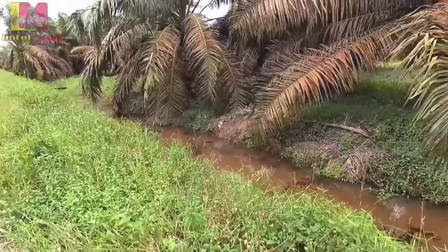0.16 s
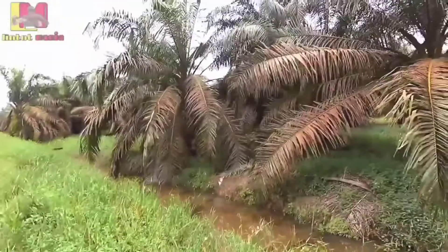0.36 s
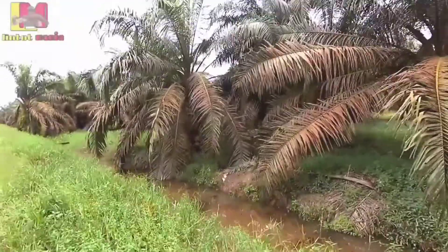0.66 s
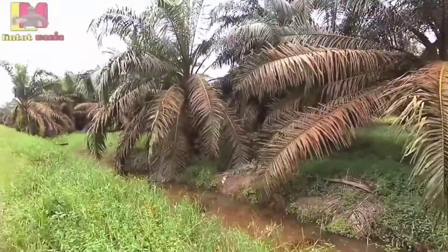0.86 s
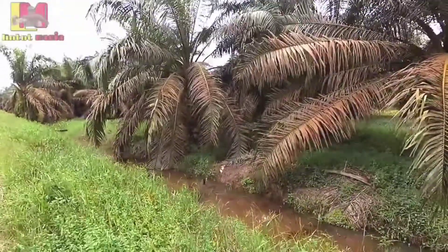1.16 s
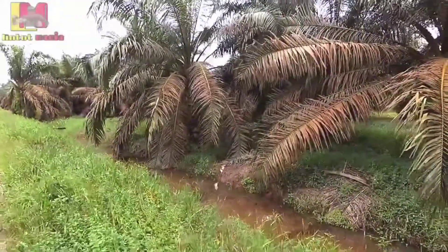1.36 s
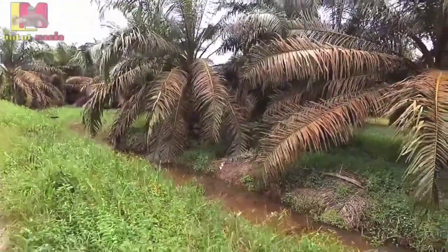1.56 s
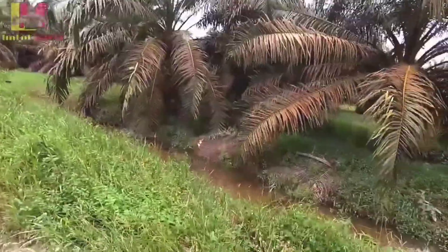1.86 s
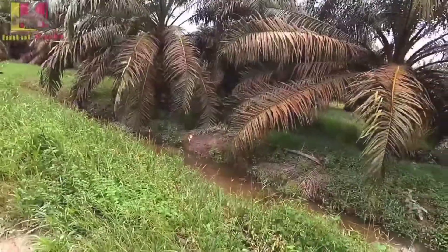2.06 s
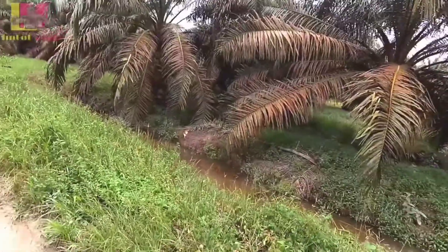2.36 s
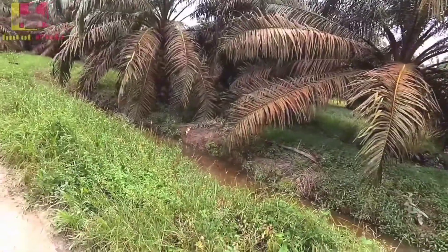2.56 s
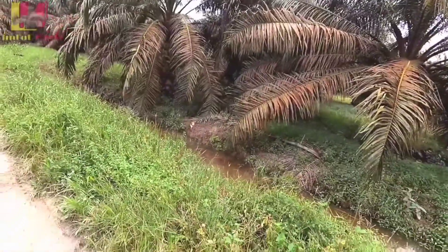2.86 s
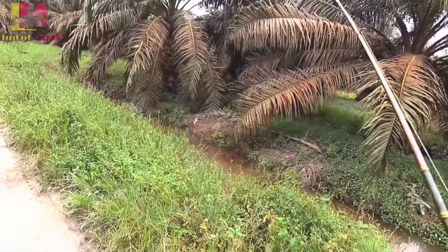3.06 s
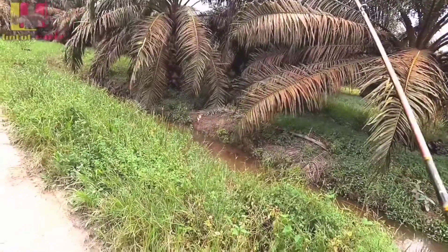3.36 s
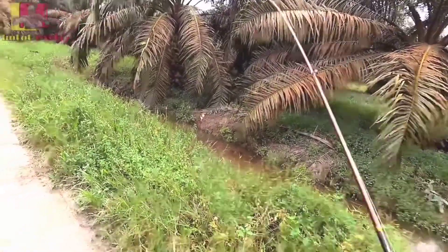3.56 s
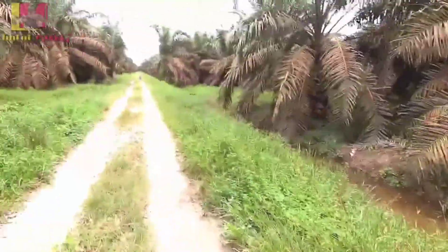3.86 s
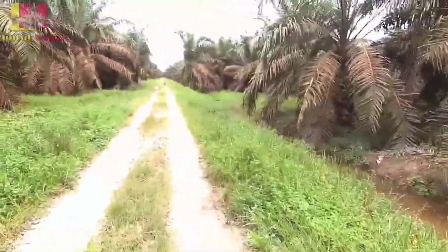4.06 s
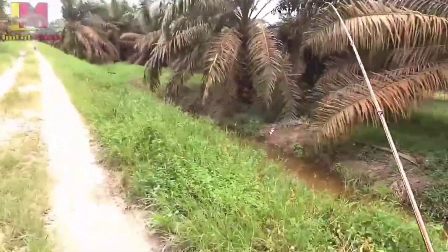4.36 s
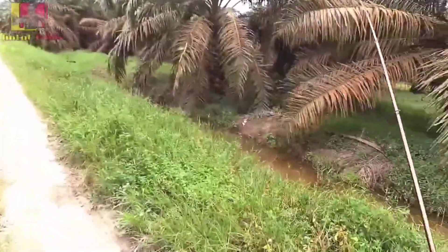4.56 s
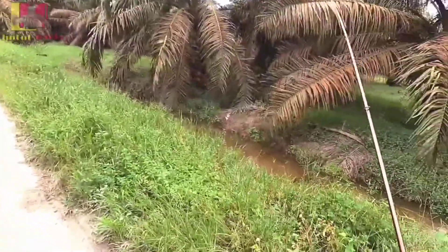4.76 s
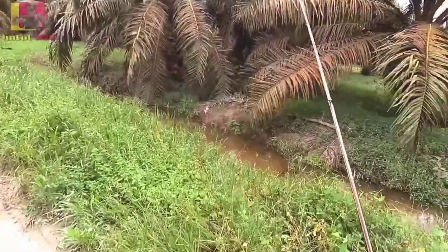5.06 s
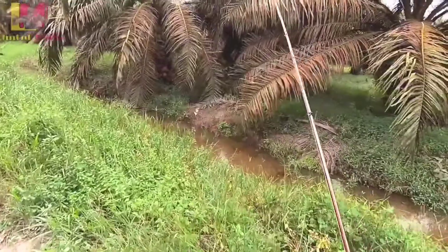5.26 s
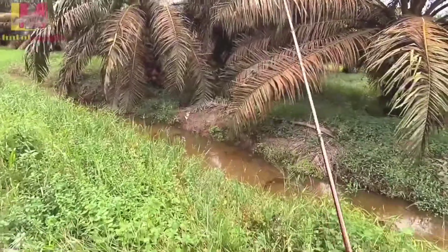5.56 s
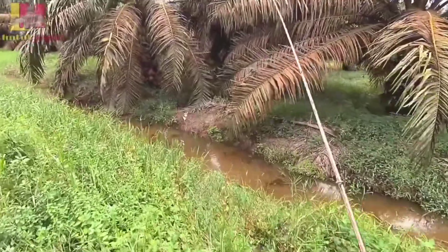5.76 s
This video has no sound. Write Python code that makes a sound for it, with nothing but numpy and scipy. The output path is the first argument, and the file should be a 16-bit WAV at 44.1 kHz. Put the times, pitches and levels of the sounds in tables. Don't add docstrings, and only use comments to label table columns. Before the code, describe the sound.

Someone treads slowly through dry grass on a dirt track, stems crackling, while distant cicadas and a shrill cricket hiss on.

```python
import sys
import numpy as np
from scipy import signal
from scipy.io import wavfile

SR = 44100
rng = np.random.default_rng(int(sys.argv[2]) if len(sys.argv) > 2 else 0)


def voltage_ratio(level):
    return 10 ** (np.asarray(level, float) / 20)


def file_out(sig):
    cols = np.atleast_2d(sig).T
    lim = np.clip(cols, -1, 1)
    pcm = np.round(lim * 32767).astype(np.int16)
    wavfile.write(sys.argv[1], SR, pcm)


N = 261072


def rms_one(x):
    return x / np.sqrt(np.mean(x ** 2) + 1e-20)


def in_time(rows):
    s, *columns = np.transpose(rows)
    return [np.interp(np.arange(N) / SR, s, c) for c in columns]


def at_hz(points, hz):
    table_hz, values = np.transpose(points)
    return np.interp(np.log(hz), np.log(np.maximum(table_hz, 1)), values)


def drift(rate):
    r = np.exp(-80 * np.pi * rate / SR)
    slow = signal.lfilter([1], [1, -2 * r, r * r], rng.standard_normal(N // 40 + 2002))[2000:]
    return np.interp(np.arange(N) / 40, np.arange(len(slow)), rms_one(slow))


def swell(peak_s, peak_db, rise_db_per_s, fall_db_per_s):
    t = np.arange(N) / SR - peak_s
    drop_db = np.where(t < 0, -rise_db_per_s, fall_db_per_s) * t
    return voltage_ratio(peak_db - np.minimum(drop_db, 90))


def ring(clicks, hz, t60):
    r, w = voltage_ratio(-60 / (t60 * SR)), 2 * np.pi * hz / SR
    return signal.lfilter([0, np.sin(w)], [1, -2 * r * np.cos(w), r * r], clicks + 1e-18)


def band(x, low_hz, high_hz):
    edges = [low_hz, min(high_hz, .45 * SR)]
    return signal.sosfilt(signal.butter(2, edges, "band", fs=SR, output="sos"), x)


def pan(left_right_db):
    return voltage_ratio(np.array([left_right_db / 2, -left_right_db / 2]))


def stereo(mid, side, alike):
    alike = np.clip(alike, -1, 1)
    return np.sqrt(1 + alike) * mid + np.sqrt(1 - alike) * side * [[1], [-1]]


# f/Hz, likeness (-1 to 1)
FAR_LIKENESS = [(60, 0.41), (250, 0.18), (950, -0.69), (3770, -0.6), (15000, 0.17)]


def coloured(spectrum, edges, patchy_db):
    out, white = 0, rng.standard_normal((2, 2, N))
    for k, (low, high) in enumerate(zip(edges, edges[1:])):
        hz = np.sqrt(low * high)
        mid, side = band(white[k % 2], low, high)
        gain = voltage_ratio(at_hz(spectrum, hz) + patchy_db * drift(23.0))
        out = out + gain * stereo(mid, side, at_hz(FAR_LIKENESS, hz))
    return rms_one(out)


# f/Hz, level/dB per Hz
AIR = [(18, -49), (30, -7), (69, -5), (482, 1), (1260, -2.5), (1980, -2), (3040, -23), (3910, -6),
       (4670, 9), (5860, -0.5), (7170, -18), (8780, -41), (12500, -6), (16200, -36), (22000, -120)]


def open_air():
    return voltage_ratio(-62.5) * coloured(AIR, 30 * 2 ** np.arange(0, 9, .6), patchy_db=1.5) * pan(-3.0)[:, None]


# t/s, level/dB
MOTOR = [(0.0, -102), (4.2, -93), (4.6, -84), (5.4, -81), (5.92, -93)]


def motor():
    pitch_hz, width_hz = 136, 5.4
    note = band(rng.standard_normal(N), pitch_hz - width_hz / 2, pitch_hz + width_hz / 2)
    return voltage_ratio(in_time(MOTOR)[0]) * rms_one(note) * pan(-5.0)[:, None]


# t/s, level/dB, left-right/dB
CICADAS = [(0.0, -49.5, -3.5), (0.7, -51, -7.5), (1.6, -50.5, -6), (2.11, -48, -5), (2.49, -49, -7),
           (2.87, -48.5, -3), (3.1, -48.5, -8), (4.12, -48.5, -6), (5.92, -49.5, -6)]
# f/Hz, width/Hz, level/dB
CICADA_BANDS = [
    (7210, 1100, -3.5),
    (3016, 280, -17.5),
    (4460, 560, -16),
]


def cicadas():
    level_db, side_db = in_time(CICADAS)
    chorus = 0
    for hz, width, db in CICADA_BANDS:
        hiss = band(rng.standard_normal((2, N)), hz - width / 2, hz + width / 2)
        hiss = band(hiss, hz - 0.72 * width, hz + 0.71 * width)
        chorus = chorus + voltage_ratio(db + 1.2 * drift(48)) * rms_one(hiss)
    return voltage_ratio(level_db - 3.0) * chorus * pan(side_db)


# t/s, level/dB, left-right/dB, throb/dB
CRICKET = [(0.03, -42, -6, -2), (0.15, -40, -7, -1), (0.26, -46.5, -9, -1), (0.37, -38.5, -8, 2),
           (0.55, -42, -10, -4), (0.8, -45, -8, 4), (1.4, -44, -10, 3), (1.85, -40, -9, 1.5),
           (2.42, -41, -9, 2), (2.8, -40.5, -9.5, 2), (3.6, -40, -9, 1), (4.3, -41.5, -8, 1),
           (5.0, -41, -7, 2), (5.8, -42, -8.5, 2.6), (5.92, -46, -8, -3)]
# f/Hz, level/dB per Hz
CRICKET_COLOUR = [(10000, -16), (12000, -13), (13500, -8), (14500, -4), (15300, 0), (16500, 0)]


def cricket():
    phrases_per_s, phrase_peak_s, strokes_per_s = 5.25, 3.885, 48
    level_db, side_db, throb_db = in_time(CRICKET)
    throb_db = throb_db * np.cos(2 * np.pi * phrases_per_s * (np.arange(N) / SR - phrase_peak_s))
    turns = np.cumsum(strokes_per_s * (1 + 0.044 * drift(2.8))) / SR
    strokes = 1.35 + (.5 + .5 * np.sin(2 * np.pi * turns)) ** 2 * voltage_ratio(2.0 * drift(12))
    rasp = band(coloured(CRICKET_COLOUR, np.geomspace(10000, 16500, 11), patchy_db=.5), 10000, SR)
    loudness = 0.5 + swell(4.241, 4, 2500, 1700)
    trill = loudness * voltage_ratio(level_db + throb_db) * rms_one(strokes * rasp)
    return trill * pan(side_db + 0.53 * throb_db)


# f/Hz, width/Hz, level/dB
BOOT_MODES = [(950, 130, -27), (1810, 29, -1.5), (2200, 60, -7), (2704, 39, 1), (3030, 140, 6),
              (3500, 26, -5)]
# t/s, level/dB
CREAK = [
    [(0.38, -57), (0.408, -50), (0.414, -52), (0.452, -60), (0.482, -54), (0.504, -39), (0.64, -72)],
    [(0.62, -79), (0.7, -63), (0.742, -53), (0.77, -61), (0.9, -57)],
]


def creak():
    out, voice = np.zeros(N), 0
    slips = (rng.random(N) < 500 / SR) * rng.standard_normal((len(BOOT_MODES), N))
    for slip, (hz, width, db) in zip(slips, BOOT_MODES):
        voice = voice + voltage_ratio(db) * rms_one(ring(slip, hz, 2.7 / (1.5 * width)))
    for rows in CREAK:
        s, level_db = np.transpose(rows)
        out += voltage_ratio(np.interp(np.arange(N) / SR, s, level_db - 1.5, left=-140, right=-140))
    return out * rms_one(voice) * pan(-12.0)[:, None]


# t/s of the middle, length/s, f/Hz, peak level/dB
SQUEAKS = [(0.395, .002, 3000, -43), (.402, 0.0014, 2750, -30.5), (0.4072, 0.0013, 2840, -25),
           (0.42, 0.0027, 1440, -34), (0.482, .006, 3000, -34), (0.485, 0.014, 1870, -35),
           (.499, 0.0033, 2200, -36.5), (0.512, 0.0043, 2950, -32), (0.517, 0.0044, 2700, -32),
           (0.524, 0.0041, 2930, -43), (0.541, 0.0092, 590, -40.5), (.553, 0.0048, 2950, -45),
           (0.554, .006, 1670, -44), (0.741, 0.0091, 3050, -48), (0.759, 0.086, 1740, -55.5),
           (0.939, 0.011, 1065, -52), (1.2, 0.045, 1010, -55.5), (1.259, 0.0017, 1160, -46),
           (1.616, 0.0015, 845, -34), (2.593, 0.034, 2960, -51), (2.598, 0.018, 820, -53),
           (2.635, 0.032, 2730, -51.5), (2.667, 0.017, 1070, -53), (2.695, 0.015, 1010, -50.5),
           (2.745, 0.0038, 1010, -51), (2.765, 0.0041, 950, -49), (2.945, 0.11, 1014, -56.5),
           (5.246, 0.01, 930, -58), (5.312, 0.015, 2635, -48.5), (5.323, 0.0068, 533, -49),
           (5.357, 0.0017, 1370, -39), (5.648, 0.007, 644, -47), (5.46, .05, 3030, -63),
           (5.53, 0.044, 3000, -63), (5.602, 0.044, 2980, -63), (5.659, 0.04, 3050, -62),
           (5.089, .05, 1130, -58), (5.146, 0.047, 1310, -61), (5.199, 0.074, 560, -60.5),
           (5.296, .05, 1100, -60), (5.39, 0.033, 1000, -61), (5.736, 0.0024, 1160, -53),
           (5.754, 0.002, 900, -60), (5.538, 0.0018, 1100, -55), (5.615, 0.0021, 860, -42),
           (4.63, .006, 540, -53), (0.778, 0.0038, 615, -51), (1.133, 0.0021, 1010, -45)]


def squeaks(size=6000):
    width_hz, clear_s = 420, .008
    out, t = np.zeros((2, N + size)), (np.arange(size) - size // 2) / SR
    for (s, length, hz, peak_db), grit in zip(SQUEAKS, rng.standard_normal((len(SQUEAKS), size))):
        rough = rms_one(band(grit, hz - width_hz / 2, hz + width_hz / 2))
        clear = np.exp(-length / clear_s)
        note = clear * np.sin(2 * np.pi * hz * t) + 0.68 * (1 - clear) * rough
        note = note * np.exp(-2 * (t / length) ** 2)
        at = round(s * SR) - size // 2
        out[:, at:at + size] += voltage_ratio(peak_db) * note * pan(-7.5)[:, None]
    return out[:, :N]


# t/s, peak level/dB, top f/Hz
THUDS = [(0.272, -46.5, 900), (.353, -46, 1000), (0.71, -44, 900), (.776, -56, 900), (1.083, -49.5, 900),
         (1.256, -58, 1320), (1.636, -48, 1000), (1.661, -39, 900), (2.283, -42, 710), (3.554, -41.5, 900),
         (4.107, -48, 1300), (4.626, -59, 690), (5.244, -48, 900), (5.613, -44, 1490), (5.755, -58, 800),
         (5.901, -52.5, 715)]


def thuds(size=4000):
    rise_s, t60_s, low_hz = .002, .032, 250
    out, t = np.zeros((2, N + size)), np.arange(size) / SR
    for (s, peak_db, top_hz), grit in zip(THUDS, rng.standard_normal((len(THUDS), size))):
        puff = band(grit * (1 - np.exp(-t / rise_s)) * voltage_ratio(-60 * t / t60_s), low_hz, top_hz)
        at = round(s * SR)
        out[:, at:at + size] += voltage_ratio(peak_db) * puff / abs(puff).max() * pan(-5.0)[:, None]
    return out[:, :N]


# t/s, peak level/dB, t60/s
PUSHES = [
    (.36, -62, 0.11),
    (1.64, -50.5, 0.16),
    (2.05, -72, .1),
    (2.24, -71, 0.22),
    (4.112, -65, 0.065),
    (5.32, -76, 0.18),
]


def soil():
    rest_db, rise_s = -92, 0.024
    white = rng.standard_normal((2, N))
    boom = stereo(*rms_one(band(band(white, 122, 168), 110, 185)), .8)
    buffet = .3 * rms_one(band(white, 22, 100))
    load = voltage_ratio(rest_db) + sum(swell(s, db, 20 / rise_s, 60 / t60) for s, db, t60 in PUSHES)
    return load * rms_one(boom + buffet) * pan(-4.0)[:, None]


# t/s, peak level/dB, f/Hz, left-right/dB
KNOCKS = [(0.848, -54, 566, -2), (2.366, -45.5, 1150, -3), (0.406, -35, 1420, -5), (0.461, -38.5, 776, -6),
          (0.534, -40.5, 554, -6), (0.562, -38.5, 513, -6), (0.708, -39.5, 577, -7), (0.775, -43, 633, -7),
          (0.934, -44, 1410, -7), (0.983, -36, 1000, -9), (5.307, -46, 2490, 3), (1.135, -39.5, 964, -6),
          (1.292, -59, 960, -6), (1.532, -49, 1040, -5), (1.561, -41, 500, -5.5), (1.593, -37.5, 1360, -10),
          (1.633, -29, 670, -7), (1.783, -38, 513, -8), (2.22, -32, 895, -7), (2.237, -37, 550, -6),
          (2.284, -36, 490, -8), (3.369, -45, 1060, -2), (3.554, -43.5, 665, -5.5), (3.599, -46, 1120, -2),
          (4.104, -56, 600, 0), (4.38, -45, 980, -4), (5.356, -49, 905, -2), (5.488, -45.5, 533, -4.5),
          (5.618, -35.5, 590, -5.5), (5.646, -57, 677, 4)]


def knocks(size=2600):
    rise_s, t60_s = 0.002, .021
    out, t = np.zeros((2, N + size)), np.arange(size) / SR
    for (s, peak_db, hz, side_db), grit in zip(KNOCKS, rng.standard_normal((len(KNOCKS), size))):
        modes = np.sin(2 * np.pi * hz * t) + 0.39 * np.sin(2 * np.pi * 1.68 * hz * t)
        body = modes + 1.37 * band(grit, 1.18 * hz, 2.94 * hz) * np.sqrt(800 / hz)
        blow = band(body * (1 - np.exp(-t / rise_s)) * voltage_ratio(-60 * t / t60_s), 0.45 * hz, SR)
        at = round(s * SR)
        out[:, at:at + size] += voltage_ratio(peak_db) * blow / abs(blow).max() * pan(side_db)[:, None]
    return out[:, :N]


# t/s, peak level/dB, f/Hz, left-right/dB, bright crack level/dB
SNAPS = [(0.396, -34, 9000, -5, -3), (4.351, -43, 7450, 0, 2), (4.361, -48, 1870, -1, -7),
         (0.5644, -36, 3300, -11, 1), (0.9847, -28.5, 1990, -6, -19), (1.029, -38, 4430, -3.0, -20),
         (1.1335, -35, 2280, -2, 12), (1.175, -43, 1800, -15, -9), (1.2962, -32, 5600, -14, 2),
         (1.5306, -24.5, 5900, -10, -4), (1.623, -21, 4900, -5.5, 6), (1.7014, -27, 2550, -4, -1),
         (1.798, -43, 2060, -6, -13), (2.0997, -35, 2290, -6, 14), (2.2213, -23, 4300, -13.5, -28),
         (2.8425, -22, 9000, -1, -21), (3.428, -46, 5600, -29, -20), (3.597, -38, 3850, -3, -7),
         (4.3794, -36.5, 2030, -1, -13), (5.5297, -50, 2980, 4, -5)]


def snaps(size=900):
    out, t = np.zeros((2, N + size)), np.arange(size) / SR
    first = np.exp(-t / .0003)
    second = .45 * np.exp(-abs(t - .0014) / .0003)
    splinters = .1 * np.exp(-t / .005)
    for (s, peak_db, hz, side_db, bright_db), grit in zip(SNAPS, rng.standard_normal((len(SNAPS), 2, size))):
        breaking = (7 * (t == 0) + stereo(*grit, .7)) * (first + second + splinters)
        woody = band(ring(breaking, hz, 8 / hz), 600, 12000)
        crack = band(breaking, 1200, 17500)
        snap = woody / abs(woody).max() + voltage_ratio(bright_db) * crack / abs(crack).max()
        at = round(s * SR)
        out[:, at:at + size] += voltage_ratio(peak_db) * pan(side_db)[:, None] * snap
    return out[:, :N]


# f/Hz, likeness (-1 to 1)
NEAR_LIKENESS = [(130, 0.44), (300, 0.85), (700, 0.85), (1400, 0.89), (3000, 0.57), (6000, 0.019),
                 (15000, 0.032)]
# t/s, peak level/dB, f/Hz
TICKS = [(0.3951, -42, 3230), (0.4023, -40, 1540), (0.4177, -43, 3030), (0.4762, -36, 9470),
         (0.479, -44, 3050), (0.5074, -32, 3100), (0.5525, -44, 3220), (0.6119, -60, 580),
         (0.939, -53, 560), (0.9449, -43, 1190), (0.976, -54, 690), (1.0885, -44, 3440), (1.1357, -50, 680),
         (1.1432, -54, 700), (1.2125, -58, 670), (1.216, -47, 3210), (1.2597, -49, 1200),
         (1.2886, -50, 730), (1.2966, -36, 9760), (1.2968, -53, 655), (1.6034, -44, 580),
         (1.6229, -21.5, 10300), (1.7021, -31.5, 9270), (1.738, -41, 600), (1.8862, -43, 1320),
         (1.9296, -44, 620), (1.9488, -41, 9850), (2.0178, -41.5, 1540), (2.0663, -48, 1360),
         (2.1481, -41, 9540), (2.1627, -59, 430), (2.188, -44, 1300), (2.221, -32, 9620),
         (2.2706, -42, 9780), (2.3544, -41, 10180), (2.4699, -50, 10430), (3.1913, -50.5, 480),
         (3.2985, -36, 9650), (3.3715, -50, 674), (3.4437, -54, 4020), (3.5272, -48, 1210),
         (3.5417, -41, 10660), (3.5644, -45, 3230), (3.6797, -47, 4310), (3.6801, -54, 1280),
         (3.7989, -43, 4440), (3.8178, -57, 1340), (4.0605, -62, 450), (4.382, -56, 500),
         (4.4928, -50, 1450), (4.64, -49.5, 510), (4.9163, -50, 9080), (4.9495, -46, 9220),
         (4.98, -59, 610), (5.247, -50, 1120), (5.3054, -45, 3690), (5.3571, -50, 580), (5.5334, -49, 1280),
         (5.6523, -51, 580), (5.7567, -56, 1290)]


def ticks(size=800):
    out, t = np.zeros((2, N + size)), (np.arange(size) - size // 2) / SR
    for (s, peak_db, hz), grit in zip(TICKS, rng.standard_normal((len(TICKS), 2, size))):
        rough = rms_one(band(stereo(*grit, at_hz(NEAR_LIKENESS, hz)), .6 * hz, 1.6 * hz))
        length_s = 0.00018 + 1.47 / hz
        tick = (np.sin(2 * np.pi * hz * t) + 0.32 * rough) * np.exp(-2 * (t / length_s) ** 2)
        at = round(s * SR) - size // 2
        out[:, at:at + size] += voltage_ratio(peak_db) * tick * pan(-6.0)[:, None]
    return out[:, :N]


# f/Hz, level/dB
FIBRE_COLOUR = [(250, -19), (480, -7), (720, -6), (1000, -4), (1400, -4.5), (1850, -1), (2300, -4),
                (2800, 1.5), (4200, 0.5), (5300, 6), (13500, 4.5)]


def rustle(low_hz, high_hz, per_s, cycles, spread_db, clumps, count=12):
    born = rng.random(N) < per_s * clumps / SR
    size_db = spread_db * np.minimum(rng.exponential(1, N), 5)
    sizes = born * voltage_ratio(size_db) * rng.standard_normal((2, N))
    dealt, out = rng.integers(0, count, N), 0
    pitches = np.geomspace(low_hz, high_hz, count + 1)[:-1] * (high_hz / low_hz) ** (.5 / count)
    for k, hz in enumerate(pitches):
        mid, side = ring(sizes * (dealt == k), hz, cycles / hz)
        out = out + voltage_ratio(at_hz(FIBRE_COLOUR, hz)) * stereo(mid, side, at_hz(NEAR_LIKENESS, hz))
    return rms_one(band(out, 0.79 * low_hz, 3.4 * high_hz))


# low f/Hz, high f/Hz, grains per s, ring/cycles, size spread/dB, left-right/dB
LAYERS = [
    (254, 812, 1500, 24.7, 2, -3),
    (801, 2290, 2500, 31.3, 0, -3.5),
    (2205, 6150, 9000, 14.8, 0.5, -1.5),
    (6670, 30400, 30000, 14, -6, -3.5),
]
# level over effort/dB, share of the weight
ANSWER = [
    (-12.5, 1.29),
    (-6, 1.02),
    (0.0, -0.078),
    (1.72, -0.45),
]
# t/s, effort level/dB, weight on the stems/dB
DRAG = [(0.0, -66.5, 1.5), (0.28, -60.5, 1), (0.66, -58, -0.5), (0.86, -64.5, 3), (1.46, -54, -0.5),
        (1.68, -49.5, 6), (1.88, -50.5, 2.5), (2.34, -53, -1), (2.42, -58.5, -1.5), (2.545, -63.5, 5),
        (2.565, -55.5, 3.5), (3.45, -54, -1.5), (3.91, -61.5, -6), (4.32, -65, 4.5), (4.42, -55.5, -2),
        (5.0, -65, 1), (5.45, -63, 3.5), (5.92, -63.5, -1.5)]
# t/s of the peak, length/s, effort level/dB, weight on the stems/dB
SHUFFLES = [(0.0, 0.031, -50, 2), (0.347, 0.11, -59.5, 8.5), (0.413, 0.026, -47.5, 5),
            (0.503, 0.12, -41, 4), (0.569, 0.04, -43, -0.5), (0.739, 0.056, -50.5, 4.5),
            (0.962, 0.18, -51.5, 3.5), (1.141, 0.12, -50, -0.5), (1.196, 0.095, -58.5, 9.5),
            (1.297, 0.018, -42, 1.5), (1.365, 0.077, -48, 2), (1.537, 0.014, -47.5, -17),
            (1.62, 0.062, -45, 7.5), (1.705, 0.012, -43, -3), (1.801, 0.12, -44, 1.5),
            (2.011, 0.063, -47, 0), (2.135, 0.098, -51, -11), (2.238, 0.17, -52.5, 7),
            (2.37, 0.063, -51, 3.5), (2.852, 0.17, -48.5, -3), (2.94, 0.35, -66, 14.5),
            (3.18, 0.071, -51, -3), (3.44, 0.028, -48.5, -1), (3.616, 0.09, -51.5, -1),
            (3.81, 0.087, -51, -0.5), (4.383, 0.029, -47, -2), (4.506, 0.054, -52.5, -4.5),
            (4.707, 0.082, -51, -4), (4.974, 0.26, -56, -7), (5.185, 0.75, -61.5, 5),
            (5.328, 0.17, -53, 2.5)]
# t/s, level/dB
SOFTNESS = [(0.0, 2.5), (.6, -4), (1.45, -4.5), (1.7, 3), (2.5, -2.5), (3.5, 3), (4.5, 5), (5.3, 1),
            (5.92, 4.5)]


def grass():
    clumps = voltage_ratio(1.5 * drift(30))
    effort_db, weight_db = in_time(DRAG)
    bursts = np.array([swell(s, db, 18 / length, 24 / length) ** 2 for s, length, db, _ in SHUFFLES])
    shuffle_weight_db = np.array(SHUFFLES)[:, 3]
    out, sinks_db = 0, in_time(SOFTNESS) + [0, 0, 0]
    for (over_db, share), sink_db, layer in zip(ANSWER, sinks_db, LAYERS):
        drag_power = voltage_ratio(effort_db + share * weight_db) ** 2
        power = drag_power + voltage_ratio(share * shuffle_weight_db) ** 2 @ bursts
        fibres = rustle(*layer[:5], clumps) * pan(layer[5])[:, None]
        out = out + voltage_ratio(over_db + sink_db) * np.sqrt(power) * fibres
    return out


def scene():
    background = open_air() + motor() + cicadas() + cricket()
    cracks = snaps()
    feet = creak() + squeaks() + thuds() + soil() + knocks() + cracks + ticks() + grass()
    top = signal.ellip(12, .1, 80, 15360, fs=SR, output="sos")
    sharp = .06 * cracks
    return signal.sosfilt(top, background + feet - sharp) + sharp


def roll_off(x):
    return signal.sosfilt(signal.butter(12, 16640, fs=SR, output="sos"), x)


def record(dry):
    return roll_off(dry)


dry = scene()
out = record(dry)
file_out(out)
```